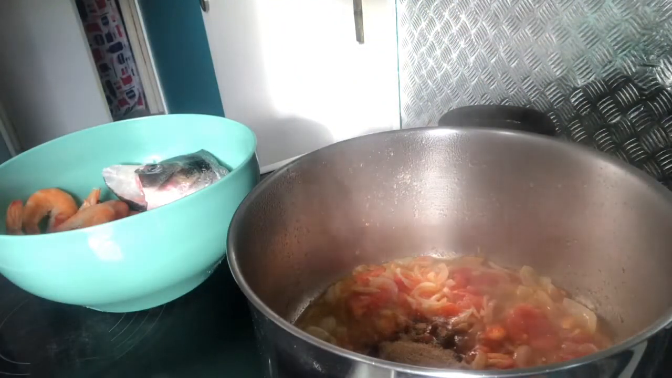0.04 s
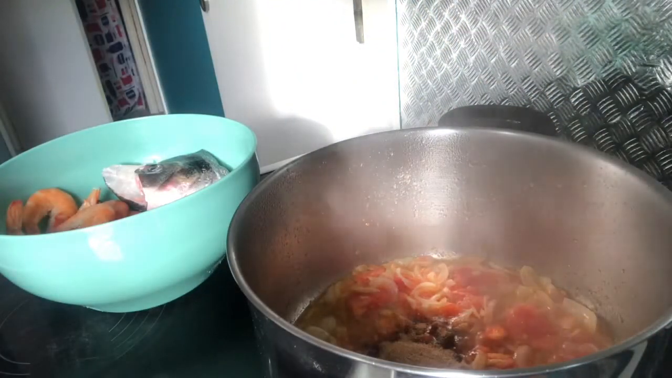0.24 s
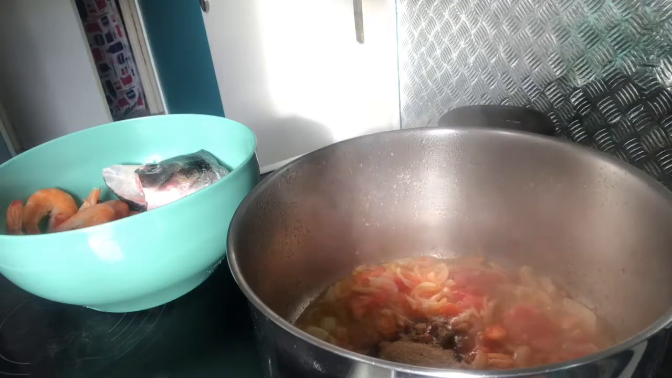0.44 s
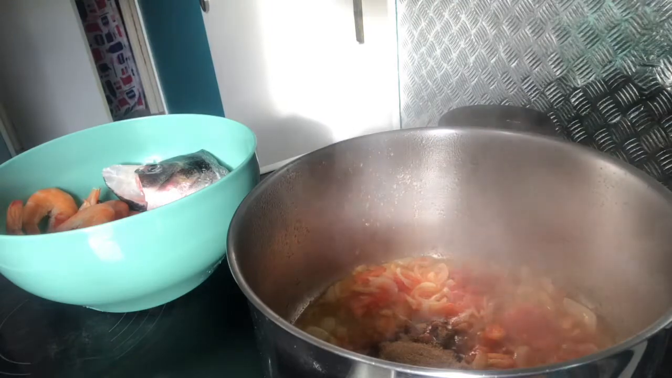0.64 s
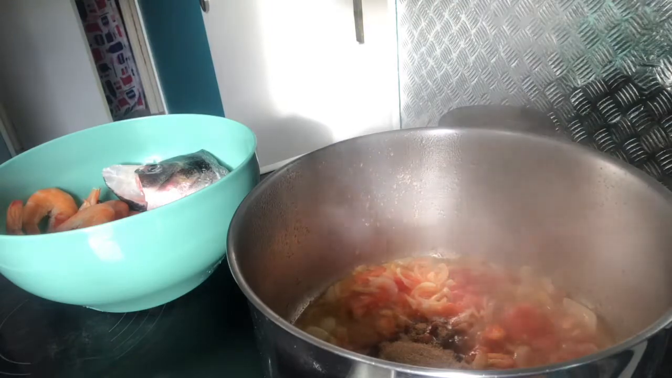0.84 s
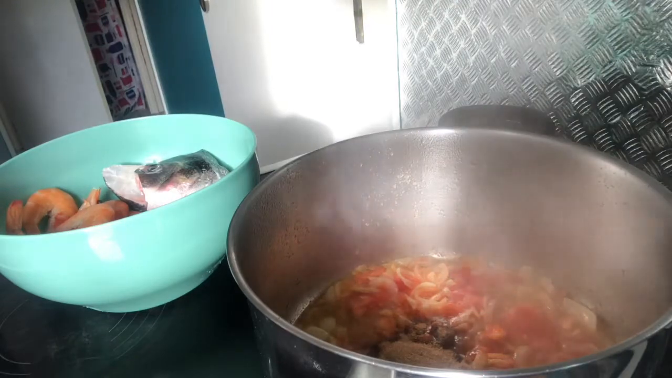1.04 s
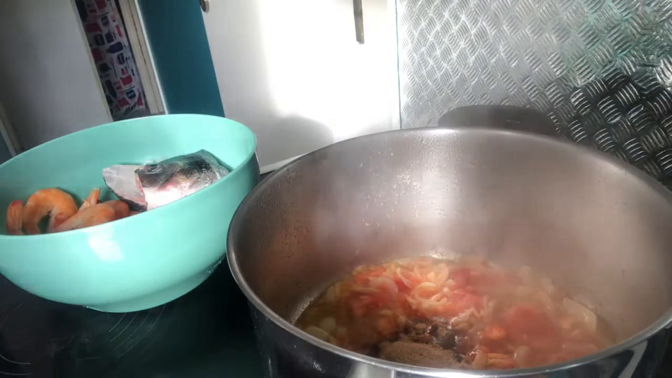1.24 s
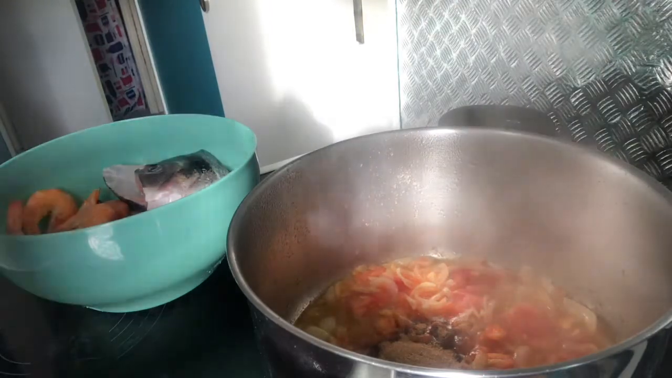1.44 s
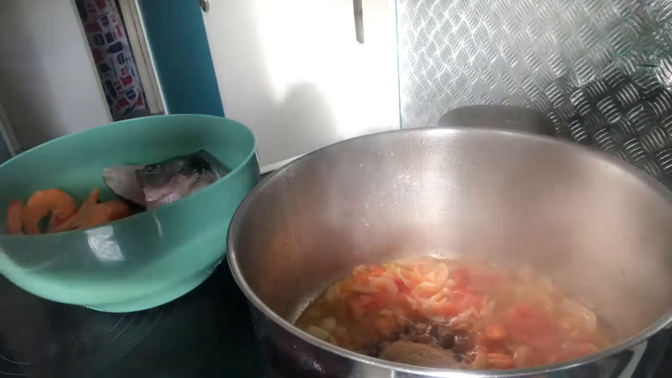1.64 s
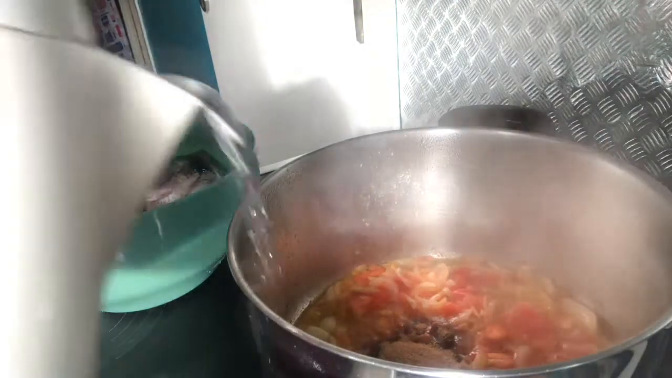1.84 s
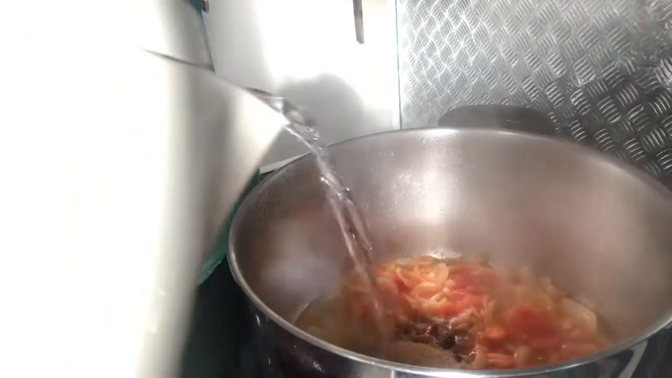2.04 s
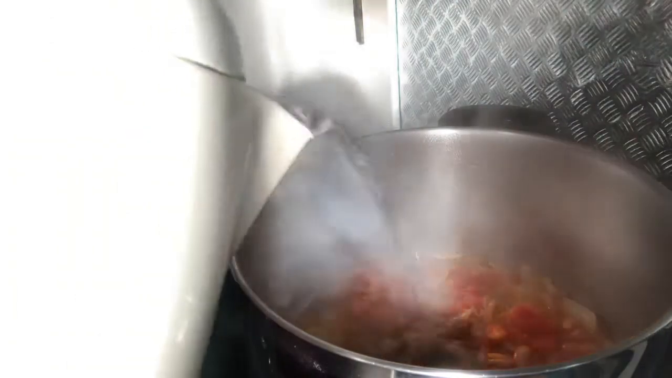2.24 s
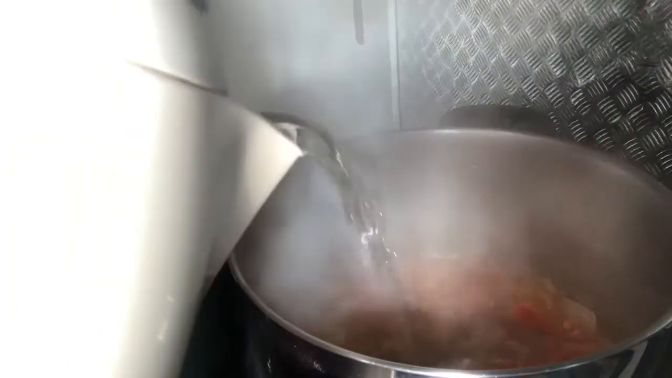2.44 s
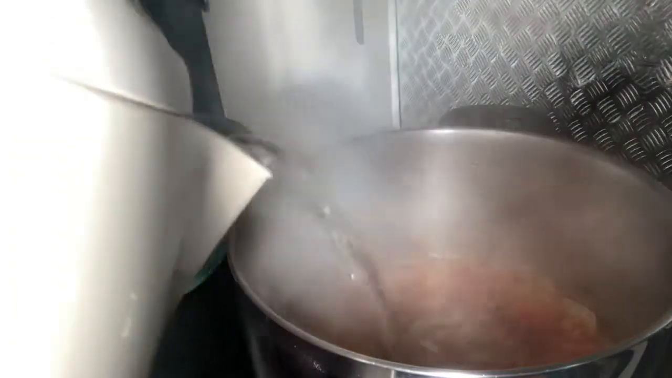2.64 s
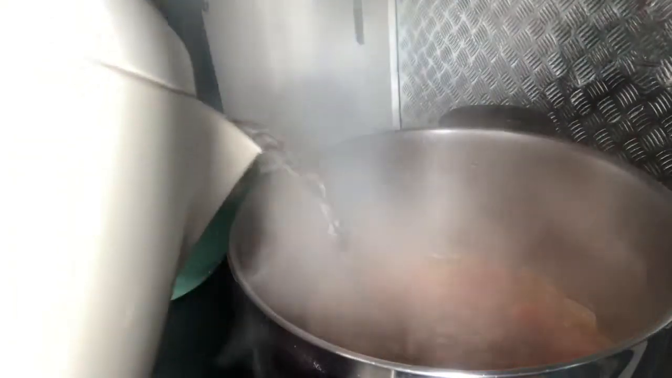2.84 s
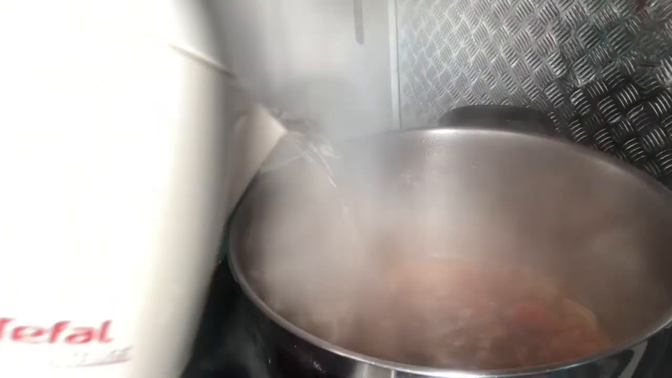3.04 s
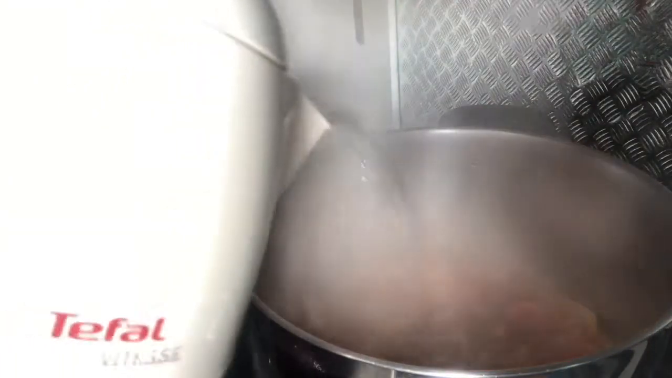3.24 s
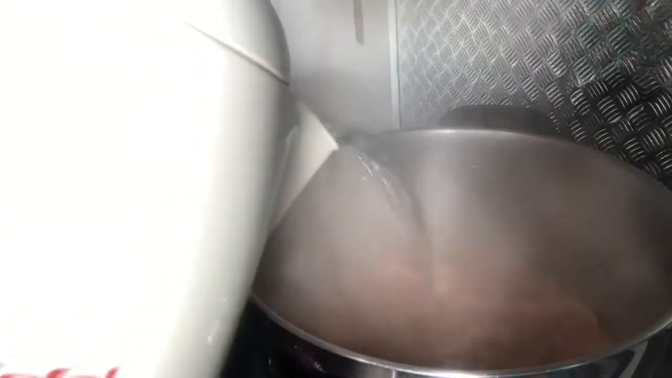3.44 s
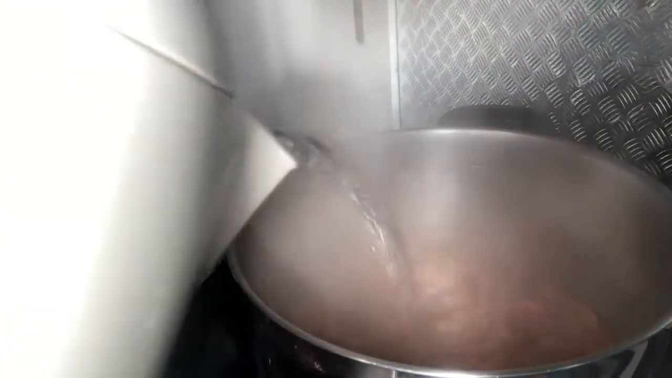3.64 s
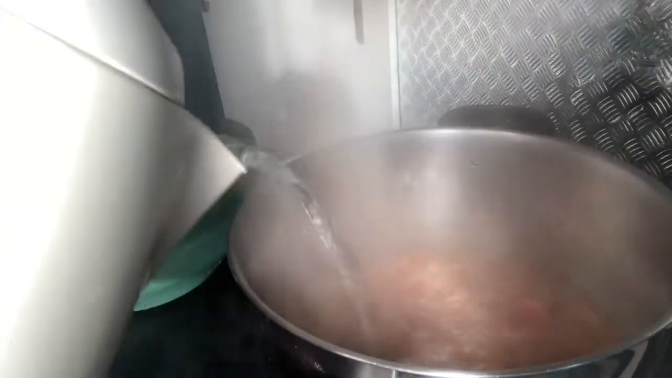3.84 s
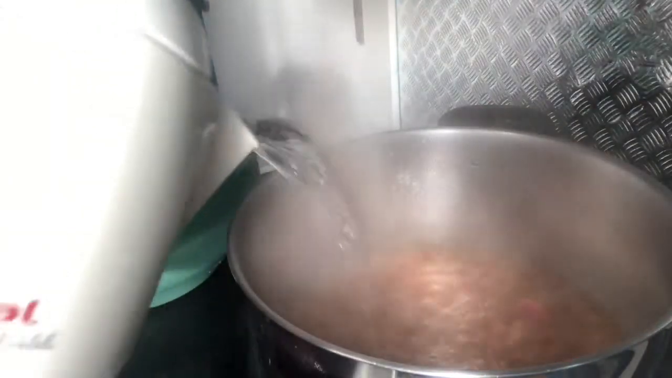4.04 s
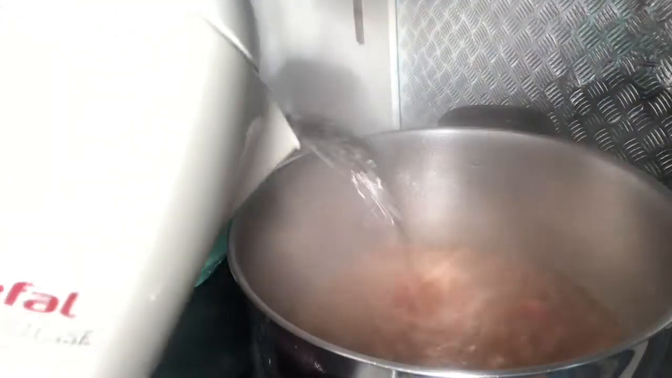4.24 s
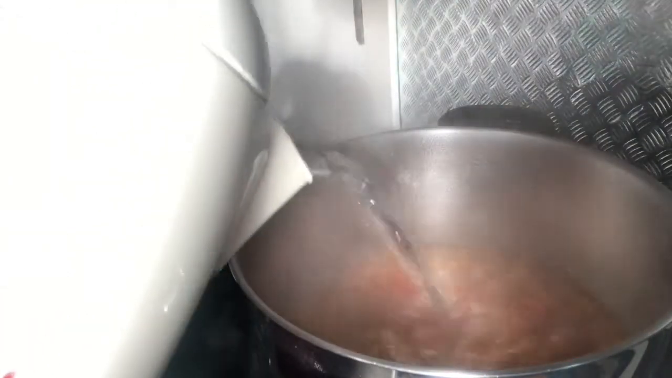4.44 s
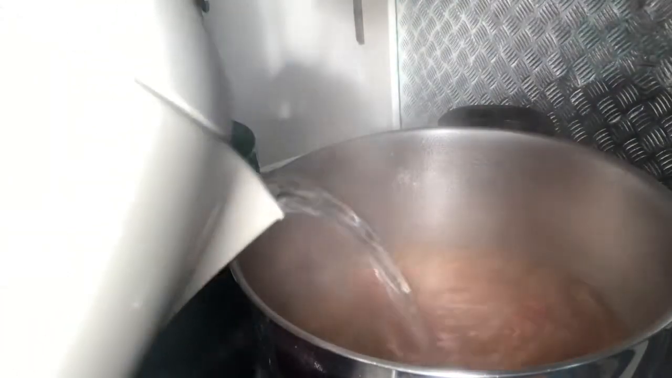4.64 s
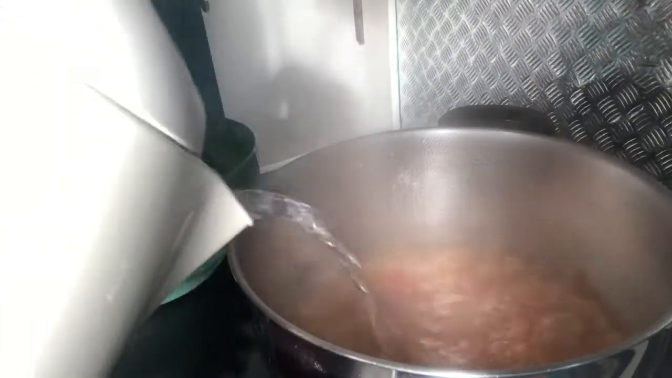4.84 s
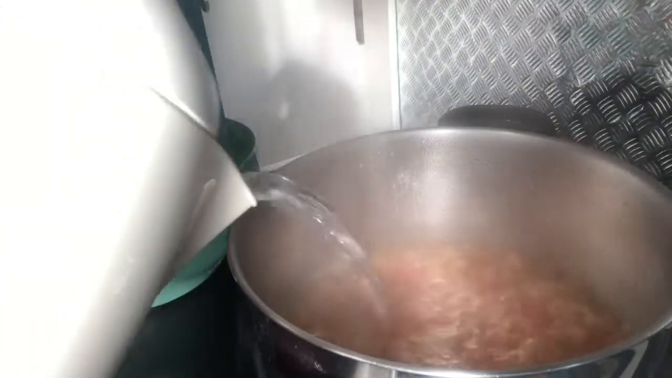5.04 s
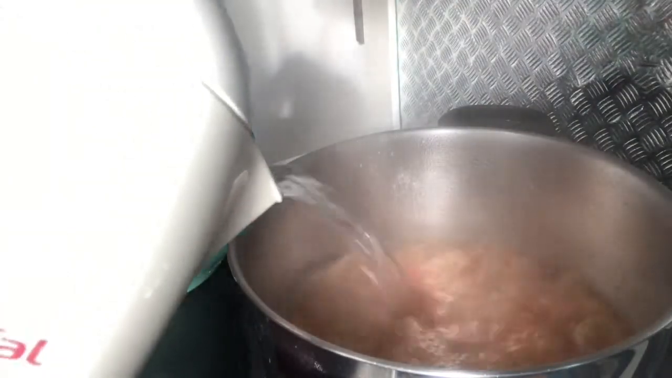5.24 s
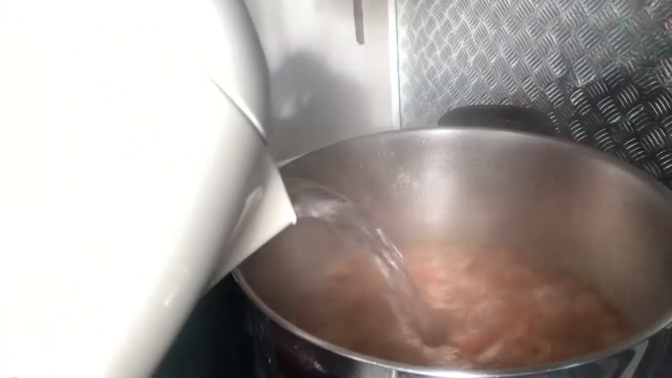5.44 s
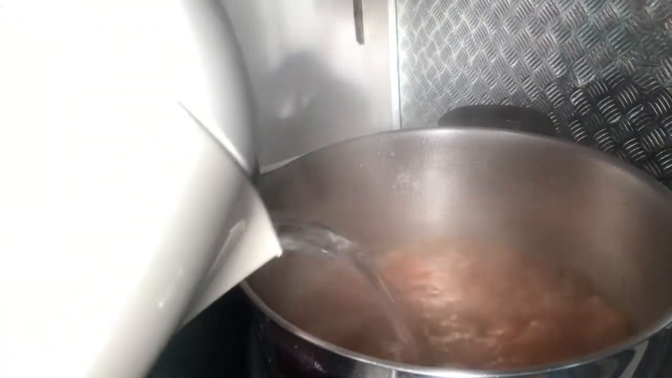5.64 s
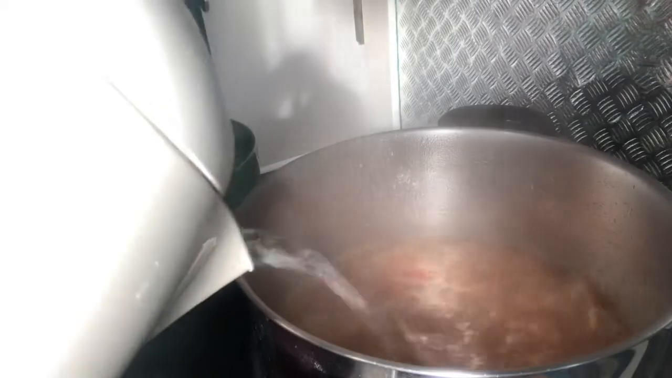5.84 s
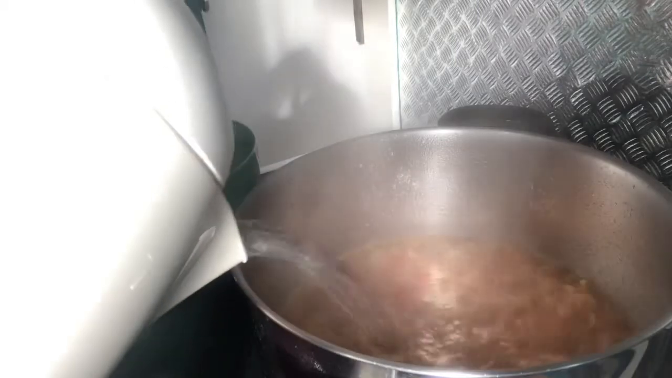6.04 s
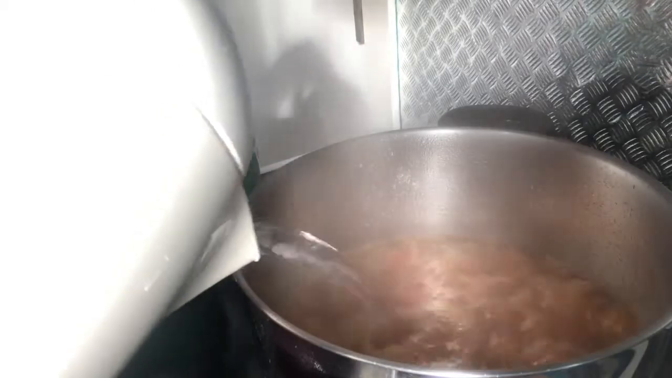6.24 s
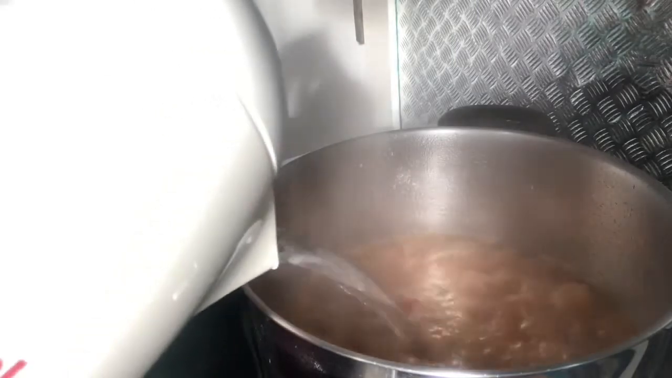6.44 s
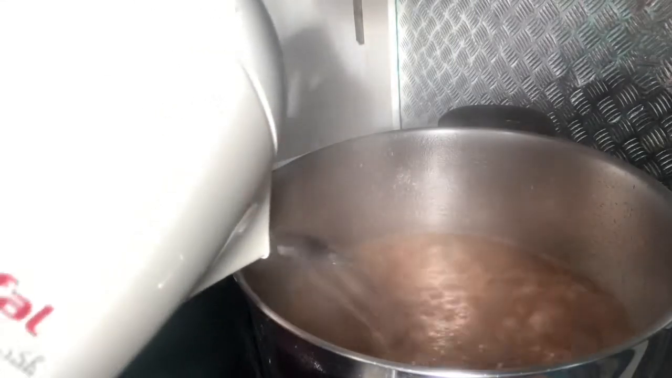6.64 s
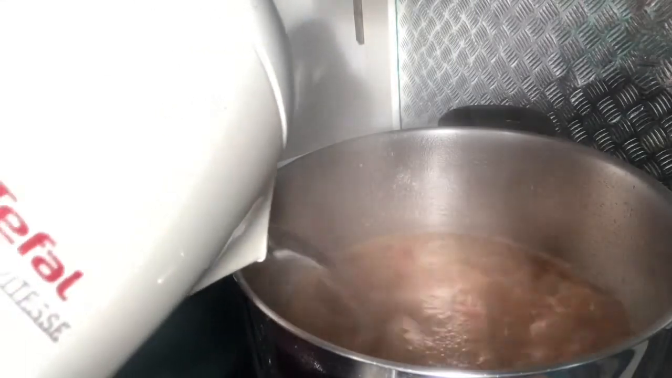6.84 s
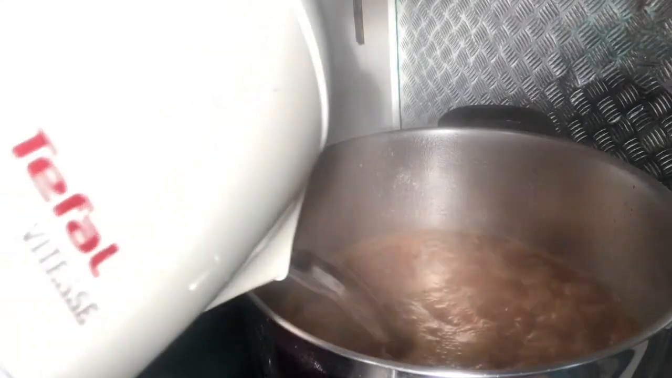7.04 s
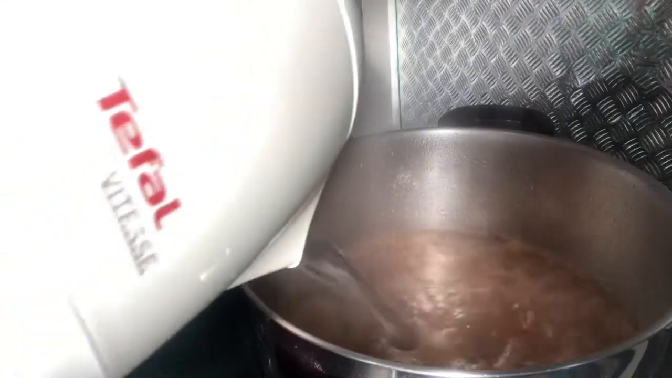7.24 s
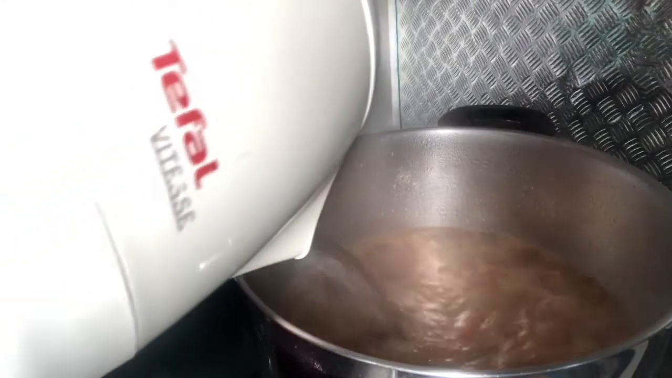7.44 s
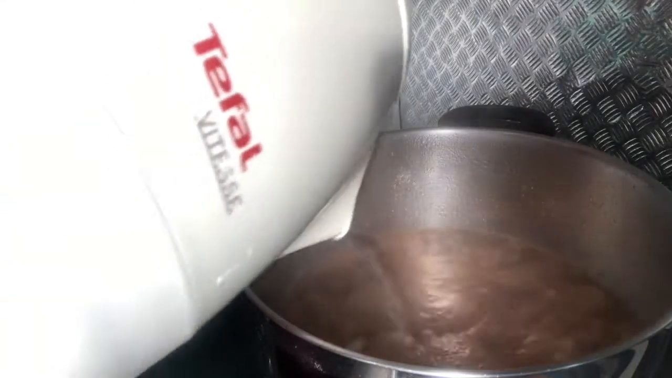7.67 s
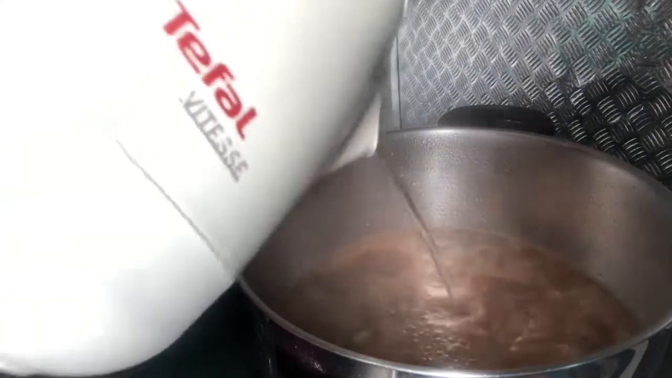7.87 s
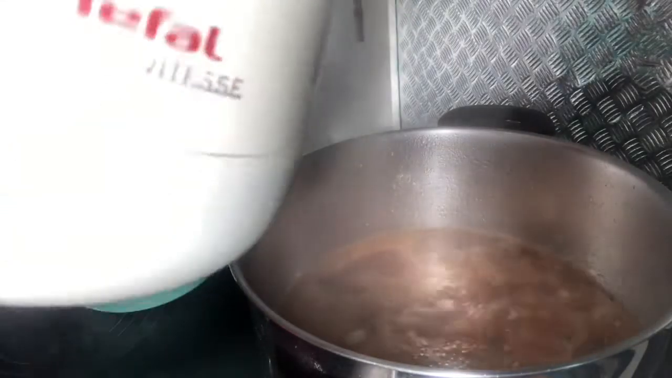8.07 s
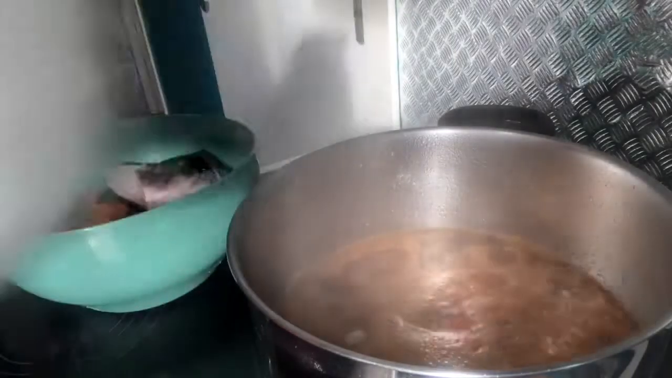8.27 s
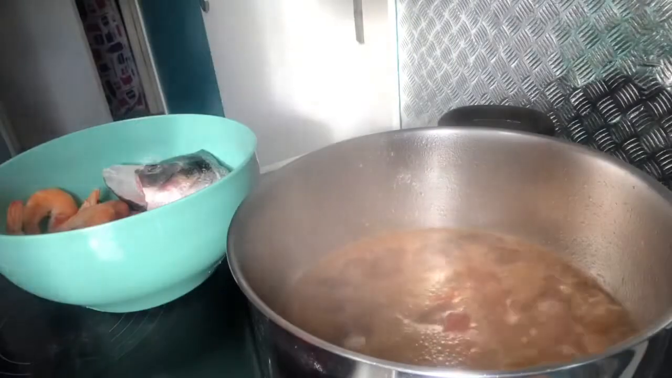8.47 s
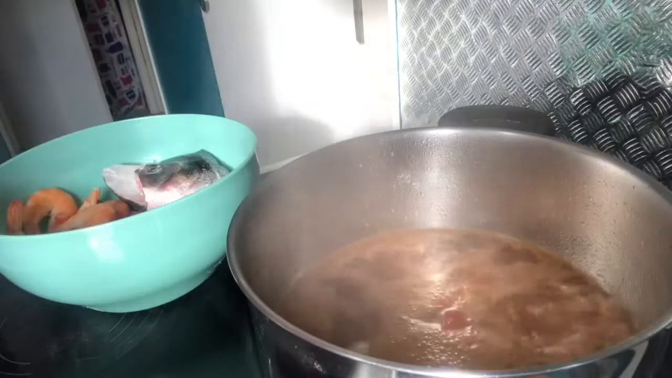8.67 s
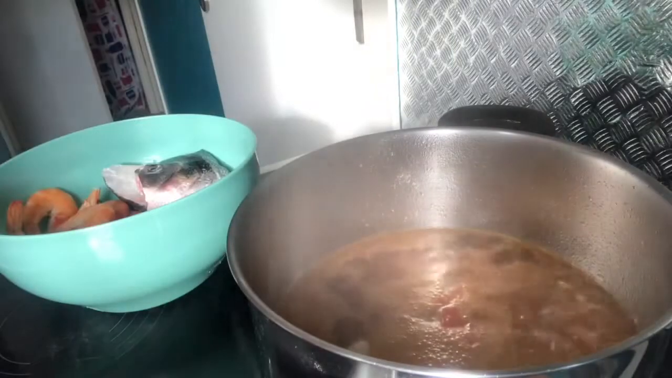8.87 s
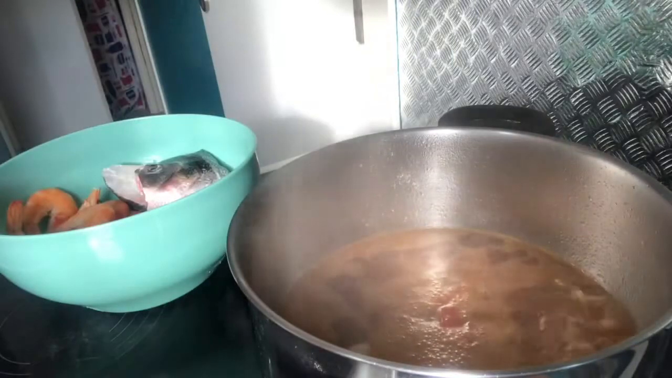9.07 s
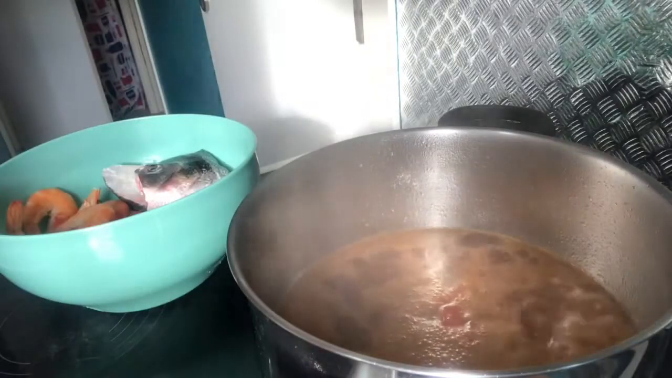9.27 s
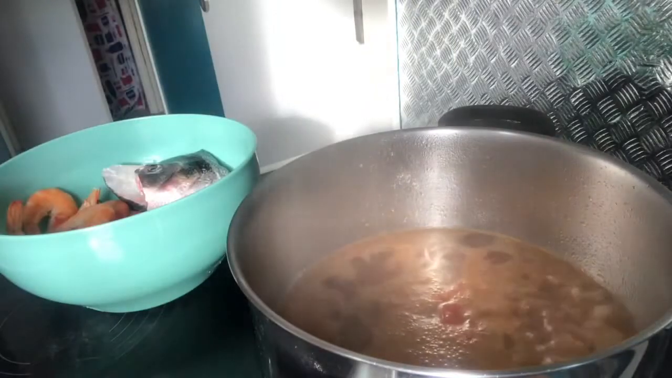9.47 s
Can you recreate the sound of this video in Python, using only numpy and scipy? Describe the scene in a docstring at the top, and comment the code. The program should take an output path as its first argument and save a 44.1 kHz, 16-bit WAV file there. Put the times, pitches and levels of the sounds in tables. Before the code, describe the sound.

Steady frying crackle, a sudden roaring hiss as water hits hot metal, rolling boil and watery gurgle as the pot fills, ending in soft knocks.

```python
"""Water poured into a sizzling pot

Vegetables sizzle and spit in a steel pot. Water from a kettle flashes into a loud hiss, boils, then gurgles
and splashes as the pot fills and cools; a few drips and soft knocks follow. Noise, clicks and short fading
tones make the sounds. All but the knocks and the room tone pass through the air in the pot, whose
resonances rise with steam and sink back partway."""
import sys
import numpy as np
from scipy import signal
from scipy.fft import rfft, irfft, next_fast_len
from scipy.io import wavfile
from scipy.ndimage import uniform_filter1d, map_coordinates

SR = 44100
rng = np.random.default_rng(int(sys.argv[2]) if len(sys.argv) > 2 else 0)


def unload_audio(sound):
    """Save the sound as a 16-bit wav file, at the path given as the first command line argument."""
    columns = np.transpose(np.atleast_2d(sound))
    # keep every value between -1 and 1, then stretch to whole-number steps
    steps = np.round(np.clip(columns, -1, 1) * 32767)
    wavfile.write(sys.argv[1], SR, steps.astype(np.int16))


N = 419391

# air in the pot: (time [s], rise of its speed of sound [%], wetness of the bottom [0-1])
STEAM = [(1.7, 0, 0), (1.95, 4, .4), (2.4, 4.5, .6), (2.9, 10, 1), (5.3, 11.5, 1), (7.0, 8, 1),
         (8.7, 6.3, .5)]
# resonances of that air: (pitch [Hz], lift when dry [dB], lift when wet [dB], share of steam's rise followed [1])
POT_AIR = [(785, 11, 10.5, .8), (1510, 12, 12, .55), (1700, 3, 7.5, .5), (1950, -2, 5.5, .7),
           (2330, 9, 7, 1), (2870, 2.5, 5.5, .35), (3130, 5.5, 4, 1.05), (3950, 7, 7, .8),
           (4830, 5.5, 4, .6), (5500, 3, 1.5, .2), (6080, 3.5, 4.5, .15), (7000, 3, 2, 0),
           (8700, 3.5, 1, .1)]
# fixed resonances and hollows of pot and stove corner: (pitch [Hz], width [Hz], lift [dB])
CORNER = [(100, 25, 5), (285, 40, -6), (360, 80, 6), (450, 50, 6), (550, 60, 5), (728, 45, -7),
          (890, 70, 3), (1120, 130, 5), (1345, 90, -7)]
# low resonances of the broth: (pitch [Hz], width [Hz], lift [dB])
BROTH = [(228, 47, 10.5), (319, 320, 11), (928, 93, 3.5)]
# bubbles bursting in hot oil, level before the pot colours it: (time [s], level [dB], pitch [Hz], life [cycles])
OIL_POPS = [(0.084, -25, 3800, 3), (0.463, -26, 4700, 7), (0.798, -24, 5400, 5), (0.936, -19, 5600, 4),
            (1.082, -25, 5900, 8), (1.24, -20.5, 5750, 6)]
# drops that strike the pot or trap a ringing bubble in the broth, level before the pot colours it:
# (time [s], level [dB], pitch [Hz], life [cycles])
DROPS = [(4.428, -19.5, 8500, 2), (4.5585, -17.5, 9300, 5), (5.138, -32, 2550, 4), (5.211, -30, 2550, 2),
         (5.2365, -19, 7400, 3), (5.304, -28, 2550, 1.5), (5.422, -33, 2700, 3), (5.445, -26, 4500, 1.2),
         (5.499, -30, 2400, 1.5), (5.53, -31, 3300, 3), (5.633, -31.5, 2500, 4), (5.751, -33, 2850, 3),
         (5.769, -27, 2520, 0.8), (5.835, -27.5, 4030, 3), (5.862, -24, 6000, 1), (6.016, -27, 1900, 1.5),
         (6.135, -22, 3400, 1.7), (6.224, -35, 1750, 3), (6.253, -33.5, 1080, 2), (6.546, -32.5, 920, 1.5),
         (6.641, -28.5, 9800, 3), (6.653, -36, 1600, 2), (6.81, -37, 900, 1), (6.927, -18, 7800, 1),
         (7.018, -36, 950, 1), (7.045, -32, 5100, 2), (7.266, -29, 8000, 3), (7.279, -32, 5800, 2),
         (7.758, -37.5, 1900, 2.5), (7.768, -37.5, 2600, 3), (7.84, -31, 5600, 1), (7.933, -31, 7000, 2.5),
         (7.968, -32, 6800, 2), (8.016, -33.5, 2700, 2), (8.021, -32.5, 5900, 3), (8.297, -32, 6100, 0.6),
         (8.376, -38, 1900, 1.6), (8.423, -46, 1900, 2), (8.606, -38, 1000, 1), (8.797, -38, 750, 0.7)]
# short crackling flurries: most are water thrown up the hot wall, the last is a faint scrape with the last
# knock; flurries peak after a third of the length, level sets their strength before the pot colours it: (time
# [s], level [dB], length [s], pitch [Hz])
FLURRIES = [(1.866, -24, 0.096, 8300), (1.945, -23, 0.15, 4200), (2.188, -19.5, 0.011, 4000),
            (2.52, -21.5, 0.14, 5830), (4.041, -24, 0.016, 4030), (4.099, -28, 0.038, 4470),
            (4.272, -28.5, 0.06, 6500), (4.696, -24, 0.015, 7650), (4.716, -25.5, 0.026, 8200),
            (4.766, -24, 0.017, 7000), (4.845, -29, 0.019, 6500), (4.984, -28, 0.027, 6750),
            (5.064, -30, 0.013, 6550), (5.096, -28, 0.02, 6700), (5.303, -29, 0.015, 6000),
            (5.576, -28, 0.012, 5170), (5.65, -31.5, 0.01, 6000), (5.696, -26.5, 0.009, 6000),
            (5.718, -28, 0.017, 6100), (5.805, -31, 0.011, 5500), (5.985, -32, 0.027, 5500),
            (6.98, -34, 0.008, 6500), (7.86, -41.5, 0.17, 7140), (9.395, -43.5, 0.023, 2700)]
# soft, dull knocks: (time [s], starting level [dB], pitch [Hz], time to fall 60 dB [s])
KNOCKS = [(0.477, -48, 170, 0.15), (3.244, -40, 115, 0.16), (3.255, -28, 238, 0.075),
          (9.374, -43, 187, 0.15), (9.405, -34.5, 187, 0.18), (9.41, -54, 76, 0.28)]
# colour of the frying, before the pot: (pitch [Hz], gain [dB])
FRY_COLOUR = [(120, -27), (400, -25), (1000, -14), (1500, -3.5), (2000, -5.5), (4500, -2), (6500, 2),
              (11800, 1.5), (12400, -2.5), (15800, -4.5)]
# colour of the steam hiss, before the pot: (pitch [Hz], gain [dB])
STEAM_COLOUR = [(40, -45), (400, -19.5), (1200, -3.5), (3500, 0), (6500, 1), (9000, 1.5), (11800, -1.5),
                (12400, -4.5), (15800, -6.5)]
# deeper water muffles the steam hiss: (pitch [Hz], gain [dB])
MUFFLE_COLOUR = [(4000, 0.5), (8000, -0.5), (12000, -3), (15500, -4)]
# colour of the boiling, before the pot: (pitch [Hz], gain [dB])
BOIL_COLOUR = [(100, -42), (400, -2.5), (1200, -6.5), (1500, 0), (2000, 0.5), (2400, 2.5), (3000, -1.5),
               (9000, -19.5)]
# colour of the gurgling, before the pot: (pitch [Hz], gain [dB])
GURGLE_COLOUR = [(40, -46), (70, -15), (160, 4), (300, 3), (650, 7), (1000, -0.5), (1400, 4), (2500, -31),
                 (6000, -38)]
# tiny drops and bubbles give off little bass: (pitch [Hz], gain [dB])
TINY_COLOUR = [(100, -30), (900, -2), (3000, 0), (11000, 1), (13000, -4)]
# colour of the quiet room: (pitch [Hz], gain [dB])
ROOM_COLOUR = [(35, -51), (55, -8), (150, -1), (450, -6), (700, -12.5), (15000, -22)]
# water flashes into steam on bare hot metal: (start [s], rise [s], hold [s], level [dB], fall [dB per s])
FLASHES = [(1.789, 0.1, 0.11, -28.5, 11.5), (2.347, 0.16, 0.78, -29.5, 12)]
# the stream gushes as it lands and as the kettle is tipped back:
# (start [s], rise [s], hold [s], level [dB], fall [dB per s])
GUSHES = [(1.836, 0.082, 0.1, -41, 31), (7.8, 0.089, 0.04, -51, 45)]
# single bubbles in the deepening broth: (start [s], rise [s], hold [s], level [dB], fall [dB per s])
BLIPPING = (3.2, 1.1, 1.35, -46, 11.5)
# flung droplets over that broth: (start [s], rise [s], hold [s], level [dB], fall [dB per s])
SPATTERING = (3.2, 1.0, 1.0, -46.5, 7.5)

# the pour starts and ends (s); time for the stream to land and to make a deep broth (s)
POUR_START_S, POUR_END_S, LAND_S, FILL_S = 1.67, 8.3, 0.47, 5.85
# before the end the stream thins out, and last of all its droplets stop (s)
THINNING_S, LAST_DRIPS_S = 1.05, 0.2
# frying: level (dB), and its fall once water cools the pot (dB per s)
FRY_DB, COOL_DB_PER_S = -40, 2.5
# depth where muffling is complete (0-1); extra flutter as the stream sloshes deep broth over the sizzle (dB)
MUFFLE_DEPTH, SLOSH_DB = 0.4, 2.0
# boiling: peak level (dB), time from the pour's start to the peak (s), steepness of its swell
BOIL_DB, BOIL_PEAK_S, BOIL_STEEPNESS = -35.5, 1.215, 1.67
# boiling that goes with any sizzle (dB relative to it) and level that builds up in deep broth (dB)
BOIL_IN_SIZZLE_DB, BROTH_BOIL_DB = -15.5, -66.5
# churn of the stream: level (dB), change on a dry bottom (dB), time to pool and time held (s)
CHURN_DB, DRY_DB, POOL_S, CHURN_HOLD_S = -37, -8, 1.3, 0.91
CUSHION_DB_PER_S = 3.5  # the churn's fall as the broth cushions it
# the juices simmer without the stream: level and change in deep broth (dB)
SIMMER_DB, SIMMER_DEEP_DB = -54, -5
# width of an air resonance: base (Hz), share of its pitch, widening relative to the rise in steam
WIDTH_HZ, WIDTH_SHARE, BLUR = 85, .028, 2
# the splash around a drop falls to 37 % in this time (s); drops pitched above this splash less (Hz)
SPLASH_S, SPLASH_HZ = .006, 2000
# a bubble's pitch rises by twice this share during one life, the time it takes to fade to 37 %
CHIRP = 0.025
TOP_HZ = 15850  # band limit of the microphone


def sizzle(frying, steaming, depth):
    """Add frying and steam, which flutter together, more so as the stream sloshes deep broth over them."""
    flutter_db = (.8 + SLOSH_DB * depth * pouring(THINNING_S)) * wobble(70)
    return amp(flutter_db) * (frying * fry(depth) + steaming * steam(depth))


def fry(depth):
    """Droplets burst in hot oil as ticks, clicks and noise; under broth the clicks grow sparse."""
    ticks = bubbles(rate=2500, pitch_hz=8300, spread=0.5, cycles=1.0, size_db=3.0, rise=0, size=60)
    dense = .6 * ticks + crackle(rate=2500, size_db=3.2) + .8 * rng.standard_normal(N)
    sparse = crackle(rate=550, size_db=3.0)
    source = blend(unit(dense), sparse, .75 * depth)
    return unit(in_pot(shaped(source, FRY_COLOUR))) * amp(.8 * wobble(40))


def steam(depth):
    """Water flashing on bare metal hisses as shifting noise, which dulls with depth."""
    source = patchy_noise(patchy_db=1.6, size=(4, 9))
    hiss = unit(in_pot(shaped(source, STEAM_COLOUR)))
    muffled = shaped(hiss, MUFFLE_COLOUR)
    return hiss + np.minimum(depth / MUFFLE_DEPTH, 1) * (muffled - hiss)


def heat():
    """Gains of the frying, which fades as the pot cools, and of the flashes of steam."""
    frying = amp(FRY_DB - COOL_DB_PER_S * since(POUR_START_S))
    steaming = combined([swell(*flash) for flash in FLASHES])
    return frying, steaming


def boil(sizzling, depth):
    """Small steam bubbles collapse: many soon after water lands, some with any sizzle, a few in deep broth."""
    source = bubbles(rate=1400, pitch_hz=2200, spread=.45, cycles=2.5, size_db=3, rise=CHIRP, size=300)
    source = source + patchy_noise(patchy_db=1.8)
    age = since(POUR_START_S) / BOIL_PEAK_S
    surge = amp(BOIL_DB) * (age * np.exp(1 - age)) ** BOIL_STEEPNESS
    gain = combined([surge, amp(BOIL_IN_SIZZLE_DB) * sizzling, amp(BROTH_BOIL_DB) * depth])
    return gain * amp(0.39 * wobble(30)) * unit(in_pot(shaped(source, BOIL_COLOUR)))


def gurgle(depth):
    """The stream churns shallow water into a wash; deeper broth rings low and its bubbles stand apart."""
    wash = bubbles(rate=900, pitch_hz=907, spread=0.427, cycles=2.7, size_db=1.5, rise=CHIRP, size=600)
    wash = in_pot(shaped(wash + amp(15.0) * rng.standard_normal(N), GURGLE_COLOUR))
    plops = bubbles(rate=480, pitch_hz=1280, spread=.27, cycles=1.9, size_db=2.6, rise=CHIRP, size=700)
    glugs = bubbles(rate=60, pitch_hz=600, spread=.3, cycles=1, size_db=2, rise=CHIRP, size=900)
    broth = plops + amp(-14) * glugs + amp(5.5) * rng.standard_normal(N)
    broth = resonant(in_pot(shaped(broth, GURGLE_COLOUR)), BROTH)
    dry_db = DRY_DB * (1 - ramp(POUR_START_S, POOL_S))
    cushion_db = CUSHION_DB_PER_S * since(POUR_START_S + POOL_S + CHURN_HOLD_S)
    churn = pouring(THINNING_S) * amp(CHURN_DB + dry_db - cushion_db)
    simmer = amp(SIMMER_DB + SIMMER_DEEP_DB * depth)
    gain = combined([churn, simmer, *(swell(*gush) for gush in GUSHES)])
    return gain * amp(0.63 * wobble(17)) * blend(unit(wash), unit(broth), depth)


def flurries():
    """Crackling flurries: splashes on the wall boil off as fine fizz, then crackles and ringing droplets as it
    cools; the last is a faint scrape with the last knock."""
    out, t = np.zeros(N + SR), np.arange(SR // 2) / SR
    fizz, coarse = crackle(rate=9000, size_db=2), crackle(rate=1100, size_db=2.3)
    droplets = bubbles(rate=700, pitch_hz=6500, spread=.35, cycles=3.5, size_db=1.5, rise=CHIRP, size=140)
    ticks = blend(fizz, unit(coarse + droplets), ramp(POUR_START_S, FILL_S / 2))
    ticks = np.tile(ticks, 2)  # spare length for flurries near the end
    for s, db, length, hz in FLURRIES:
        start = round(s * SR)
        band = signal.butter(1, [hz / 2, min(hz * 1.7, SR / 2.2)], "band", fs=SR)
        flurry = ticks[start:][:len(t)]
        flurry = unit(signal.lfilter(*band, signal.lfilter(*band, flurry)))
        age = 3 * t / length
        out[start:][:len(t)] += amp(db - 12) * flurry * age * np.exp(1 - age)
    return out[:N]


def pings(rows, snap_db, splash_db):
    """Each is a tiny snap, a short ringing bubble that rises in pitch, and a splash of fainter bubbles."""
    out, t = np.zeros(N + SR), np.arange(SR // 20) / SR
    splashes = bubbles(rate=1200, pitch_hz=2000, spread=.7, cycles=2, size_db=1, rise=CHIRP, size=400)
    splashes = np.tile(splashes, 2)  # spare length for pings near the end
    for s, db, hz, cycles in rows:
        start, age = round(s * SR), hz * t / cycles
        ring = np.sin(2 * np.pi * hz * t * (1 + CHIRP * age)) * np.exp(-age)
        snap = amp(snap_db) * rng.standard_normal(len(t)) * np.exp(-t / .0008)
        splash_gain = amp(splash_db) * min(1, SPLASH_HZ / hz)
        splash = splash_gain * splashes[start:][:len(t)] * np.exp(-t / SPLASH_S)
        out[start:][:len(t)] += amp(db) * (ring + snap + splash)
    return out[:N]


def blips():
    """In deepening broth single bubbles ring clear and flung droplets patter, both in clusters."""
    rings = bubbles(rate=380, pitch_hz=2200, spread=.36, cycles=3.5, size_db=1.8, rise=CHIRP, size=700)
    drops = bubbles(rate=240, pitch_hz=8500, spread=.3, cycles=1.4, size_db=2.6, rise=0, size=80)
    drops = drops + .7 * echo(drops, t60=0.012)
    rings = unit(in_pot(shaped(rings, TINY_COLOUR))) * clusters()
    drops = unit(in_pot(shaped(drops, TINY_COLOUR))) * clusters()
    return pouring(LAST_DRIPS_S) * (swell(*BLIPPING) * rings + swell(*SPATTERING) * drops)


def clusters():
    """Random gain that gathers events into clusters, within 4 dB up or down."""
    return amp(4 * np.tanh(wobble(45)))


def knocks():
    """Dull, quickly damped thumps: a low tone with a slight scrape of noise."""
    out, t = np.zeros(N + SR), np.arange(SR // 3) / SR
    for s, db, hz, t60 in KNOCKS:
        body = np.sin(2 * np.pi * hz * t) + amp(-17.0) * rng.standard_normal(len(t))
        onset = 1 - np.exp(-t / 0.0029)
        out[round(s * SR):][:len(t)] += amp(db - 60 * t / t60) * onset * body
    return out[:N]


def room_tone():
    """The quiet room is faint, steady noise, strongest in the low range."""
    return amp(-60.0) * unit(shaped(rng.standard_normal(N), ROOM_COLOUR))


def in_pot(x):
    """Colour sound by pot and stove corner, fading between filters for each state of the pot's air."""
    x, t = resonant(x, CORNER), np.arange(N) / SR
    times = [row[0] for row in STEAM]
    out = np.zeros(N)
    for share, (_, rise, wet) in zip(np.eye(len(STEAM)), STEAM):
        out += np.interp(t, times, share) * resonant(x, air_modes(rise, wet))
    return out


def air_modes(rise_percent, wet):
    """Steam raises the resonances and, being uneven, blurs them; a wet bottom changes their strength."""
    rise = rise_percent / 100
    modes = []
    for f, dry_db, wet_db, follow in POT_AIR:
        width = (WIDTH_HZ + WIDTH_SHARE * f) * (1 + BLUR * rise)
        modes.append((f * (1 + follow * rise), width, dry_db + wet * (wet_db - dry_db)))
    return modes


def bubbles(rate, pitch_hz, spread, cycles, size_db, rise, size):
    """Fading tones at random times, in many sizes and pitches, with pitch rising if rise is set; rms 1."""
    count = int(rate * N / SR)
    start = rng.integers(0, N, (count, 1))
    pitch_factor = np.exp(spread * rng.standard_normal((count, 1))).clip(0, SR / 2.5 / pitch_hz)
    turns = pitch_hz * pitch_factor * np.arange(size) / SR
    age = turns / cycles
    strength = amp(size_db * np.minimum(rng.exponential(1, (count, 1)), 5))
    waves = strength * np.exp(-age) * np.sin(2 * np.pi * turns * (1 + rise * age))
    places = start + np.arange(size)
    return unit(np.bincount(places.ravel(), waves.ravel(), N + size)[:N])


def crackle(rate, size_db):
    """Sharp clicks of tiny bursting droplets, mostly small and now and then large; rms 1."""
    strength = amp(size_db * np.minimum(rng.exponential(1, N), 5))
    return unit((rng.random(N) < rate / SR) * strength * rng.choice([-1, 1], N))


def patchy_noise(patchy_db, size=(5, 24)):
    """Noise whose colour shifts in patches of size (pitch bins, time frames); rms 1."""
    z = signal.stft(rng.standard_normal(N), nperseg=256)[2]
    field = uniform_filter1d(rng.standard_normal(z.shape), size[0], 0)
    field = uniform_filter1d(field, size[1], 1)
    return unit(signal.istft(z * amp(patchy_db * unit(field)), nperseg=256)[1][:N])


def pouring(trail_s):
    """Rise to 1 as the stream lands, then thin to 0 over the last trail_s of the pour."""
    return ramp(POUR_START_S, LAND_S) * (1 - ramp(POUR_END_S - trail_s, trail_s))


def swell(start_s, rise_s, hold_s, level_db, fall_db_per_s):
    """Gain that rises, holds and dies away."""
    return ramp(start_s, rise_s) * amp(level_db - fall_db_per_s * since(start_s + rise_s + hold_s))


def ramp(start_s, length_s):
    """A straight rise from 0 to 1."""
    return np.minimum(since(start_s) / length_s, 1)


def since(start_s):
    """Seconds gone by since a moment, zero before it."""
    return np.maximum(np.arange(N) / SR - start_s, 0)


def wobble(rate):
    """A smooth random curve through rate random points a second."""
    points = rng.standard_normal(int(N * rate / SR) + 4)
    return map_coordinates(points, [np.arange(N) * rate / SR], order=2)


def combined(gains):
    """Add gains by their power."""
    return np.linalg.norm(gains, axis=0)


def blend(a, b, share):
    """Equal-power fade from a to b."""
    share = np.clip(share, 0, 1)
    return np.sqrt(1 - share) * a + np.sqrt(share) * b


def amp(db):
    """Decibels to gain."""
    return 10 ** (np.asarray(db) / 20)


def unit(x):
    """Scale to rms 1."""
    return x / np.sqrt(np.mean(x ** 2) + 1e-20)


def shaped(x, points):
    """Colour x by (pitch [Hz], gain [dB]) points on a log axis."""
    f, db = np.transpose(points)
    return coloured(x, lambda hz: np.interp(np.log(hz + 1), np.log(f), db))


def resonant(x, modes):
    """Lift x around each mode (pitch [Hz], width [Hz], lift [dB])."""
    return coloured(x, lambda hz: sum(db / (1 + (2 * (hz - f) / w) ** 2) for f, w, db in modes))


def coloured(x, db_of_hz, size=4096):
    """Filter x to the given gain in dB without sounding ahead of time (minimum phase)."""
    cepstrum = irfft(db_of_hz(np.fft.rfftfreq(size, 1 / SR)) * np.log(10) / 20)
    cepstrum[1:size // 2] *= 2  # fold the filter's response onto the time after its start
    cepstrum[size // 2 + 1:] = 0
    return signal.oaconvolve(x, irfft(np.exp(rfft(cepstrum))))[:N]


def echo(x, t60):
    """A diffuse tail of fading noise with unit energy, falling 60 dB in t60 seconds."""
    t = np.arange(SR // 3) / SR
    tail = rng.standard_normal(len(t)) * amp(-60 * t / t60) * (t > .001)
    return signal.oaconvolve(x, tail / np.linalg.norm(tail))[:N]


def scene():
    """The pot with its near walls, in a small kitchen."""
    frying, steaming = heat()
    depth = ramp(POUR_START_S, FILL_S)
    bursts = pings(OIL_POPS, snap_db=-16, splash_db=-32) + pings(DROPS, snap_db=-9, splash_db=-18) + flurries()
    bursts = in_pot(shaped(bursts, TINY_COLOUR))
    bursts = bursts + amp(-8) * echo(bursts, t60=.025)  # near walls
    dry = sizzle(frying, steaming, depth) + boil(np.hypot(frying, steaming), depth)
    dry = dry + gurgle(depth) + blips() + bursts + knocks()
    kitchen = amp(-19.5) * echo(dry, t60=0.81)
    return (dry + kitchen + room_tone())[None]


def record(dry):
    """The microphone keeps nothing above its band limit."""
    m = next_fast_len(N + SR // 2)
    kept = np.fft.rfftfreq(m, 1 / SR) < TOP_HZ
    return irfft(rfft(dry, m) * kept, m)[..., :N]


dry = scene()
out = record(dry)
unload_audio(out)
```